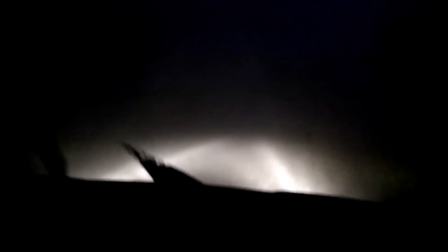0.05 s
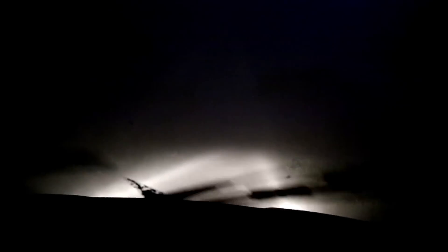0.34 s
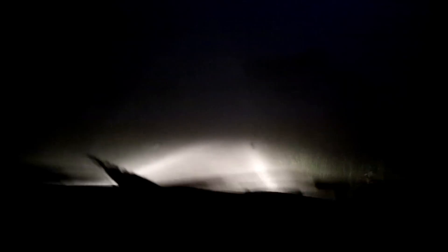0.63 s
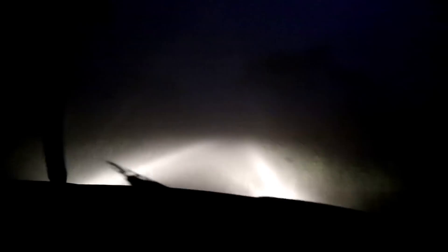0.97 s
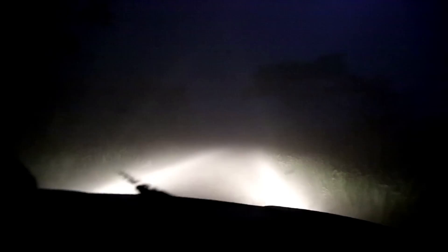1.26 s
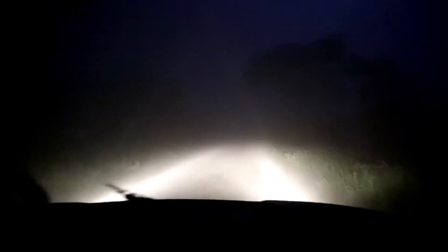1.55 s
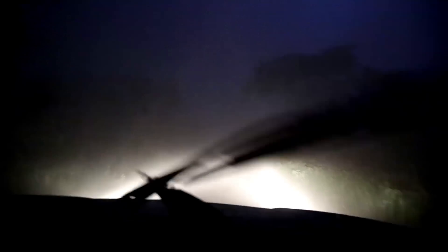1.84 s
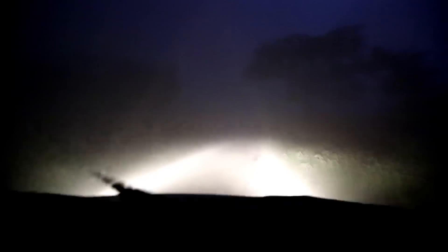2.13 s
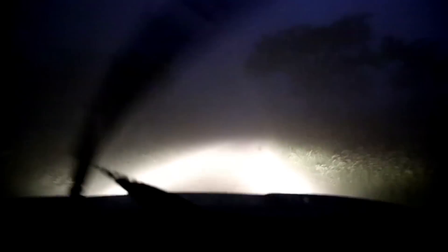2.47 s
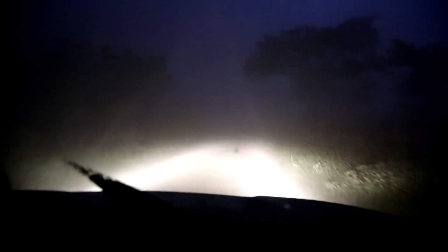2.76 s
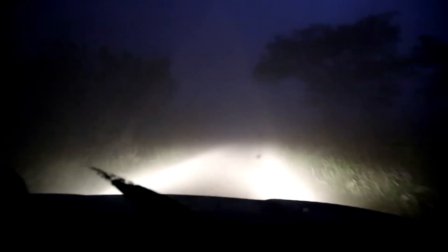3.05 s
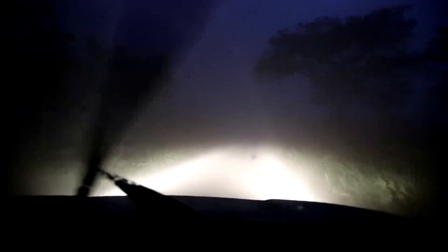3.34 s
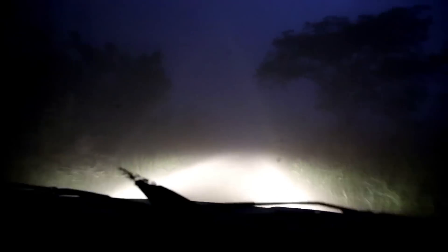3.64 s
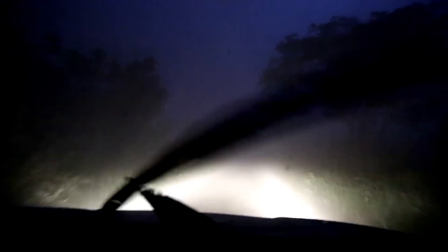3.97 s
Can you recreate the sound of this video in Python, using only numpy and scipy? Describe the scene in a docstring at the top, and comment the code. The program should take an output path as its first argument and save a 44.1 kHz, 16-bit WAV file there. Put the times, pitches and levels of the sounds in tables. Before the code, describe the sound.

A car rumbles over a bumpy wet road, heard from inside, loose trim knocking and ticking.

```python
"""A deep rumble of engine and road fills a car driving along a rough, wet track at night.
Bumps thud through the body, and the tyres throw up water and grit, a wash of noise and tiny impacts.
A loose panel knocks hard three times, smaller trim ticks and scrapes, and a few small metal pieces,
perhaps keys, clink. Each struck part rings in its own damped modes, and the upholstered cabin adds
a short reverberation. A thin electrical whine lies behind it all."""
import sys
import numpy as np
from scipy import signal
from scipy.fft import rfft, irfft
from scipy.io import wavfile

SR = 44100
rng = np.random.default_rng(int(sys.argv[2]) if len(sys.argv) > 2 else 0)


def wav_out(sig):
    """Save sig, one row per channel (or a flat mono array), as 16-bit PCM at SR to the path in sys.argv[1]."""
    wavfile.write(sys.argv[1], SR, np.round(np.clip(np.atleast_2d(sig).T, -1, 1) * 32767).astype(np.int16))


N = 176400
T = np.arange(N) / SR
HIT_T = T[:SR // 4]  # time within one impact


def from_db(db):
    """Amplitude ratio of a level in decibels."""
    return 10 ** (np.asarray(db) / 20)


def unit_rms(x):
    """Normalisation to unit mean power."""
    return x / np.sqrt(np.mean(x ** 2) + 1e-20)


def in_time(rows):
    """Linear interpolation of each column against the first, which is time."""
    times, *columns = np.transpose(rows)
    return [np.interp(T, times, column) for column in columns]


def drift(corner_hz, step=40):
    """Random modulation: low-passed noise of unit rms, drawn once every step samples."""
    pole = np.exp(-2 * np.pi * corner_hz * step / SR)
    white = rng.standard_normal(N // step + 2002)
    slow = signal.lfilter([1], [1, -2 * pole, pole * pole], white)[2000:]  # once the filter has settled
    return np.interp(np.arange(N) / step, np.arange(len(slow)), unit_rms(slow))


def noise(spectrum, size=N):
    """Spectral shaping: coloured noise of unit rms, falling 24 dB per octave beyond the given band."""
    hz, db = np.transpose(spectrum)
    f = np.arange(size // 2 + 1) * SR / size + 1e-3
    colour = from_db(np.interp(np.log(f), np.log(hz), db))
    skirts = np.minimum(1, np.minimum(f / hz[0], hz[-1] / f)) ** 4
    return unit_rms(irfft(rfft(rng.standard_normal(size)) * colour * skirts, size))


def decay(t60, hold_s=0):
    """Exponential damping: after the hold, the level falls 60 dB in t60 seconds."""
    return np.exp(-np.log(1000) * np.maximum(HIT_T - hold_s, 0) / t60)


def rise(seconds):
    """A linear attack."""
    return np.minimum(HIT_T / seconds, 1)


def struck(modes):
    """Free vibration of a struck body: a sum of damped sinusoids."""
    return sum(from_db(db) * decay(t60) * np.sin(2 * np.pi * hz * HIT_T) for hz, db, t60 in modes)


def add(out, start, sound):
    """Superposition: a sound joins the mix at its start in seconds."""
    i = int(start * SR)
    out[i:i + len(sound)] += sound[:max(N - i, 0)]


# The rumble's spectrum. Each row: frequency in Hz, relative spectral density in dB.
RUMBLE_SPECTRUM = [(11, -67), (18, -4.5), (38, 3), (70, -1), (134, 1), (154, -1), (188, -10.5), (225, -10),
                   (255, -12.5), (456, -20.5), (531, -26.5), (700, -29.5), (910, -39.5), (1540, -120)]
# The rumble's contour. Each row: time in seconds, level in dB before its swings are narrowed.
RUMBLE_CONTOUR = [(0.0, -23), (0.7, -13), (0.81, -29.5), (0.83, -20.5), (1.55, -14.5), (1.66, -23.5),
                  (1.8, -21.5), (1.88, -11.5), (1.96, -22), (2.17, -10), (2.26, -14.5), (2.28, -27.5),
                  (2.39, -12.5), (2.76, -25), (2.81, -11), (2.94, -21), (3.12, -6), (3.24, -24),
                  (3.62, -16.5), (3.66, -22.5), (4.0, -9)]

def rumble(swing_share=0.57, gain_db=0.5):
    """Forced vibration: engine and road drive the cabin with low noise that swells and ebbs."""
    contour_db, = in_time(RUMBLE_CONTOUR)
    mean_db = contour_db.mean()
    return noise(RUMBLE_SPECTRUM) * from_db(gain_db + mean_db + swing_share * (contour_db - mean_db))


# Bumps in the track. Each row: start in seconds, peak level in dB, pitch in Hz, length in seconds.
TRACK_BUMPS = [(0.93, -9, 276, 0.02), (1.258, -9.5, 102, 0.017), (1.261, -12.5, 287, 0.013),
               (1.409, -9.5, 149.5, 0.068), (1.498, -13.5, 98.7, 0.061), (2.165, -19, 139, 0.025),
               (2.247, -2.5, 78, 0.013), (2.25, -22, 285, 0.021), (2.44, -12, 116.6, 0.11),
               (2.573, -13, 126, 0.055), (2.779, -25, 408, 0.026), (2.998, -17.5, 218, 0.084),
               (3.107, -20, 129, 0.026), (3.111, -18.5, 464, 0.018), (3.113, -14.5, 282, 0.019),
               (3.117, -27, 610, 0.026), (3.126, -24, 367, 0.022), (3.538, -16.5, 215, 0.048),
               (3.872, -19.5, 219, 0.061), (3.944, -15, 238, 0.026)]

def bumps():
    """Transient response: each bump thuds through the body as a low tone that swells and fades."""
    out = np.zeros(N)
    for start, peak_db, hz, length in TRACK_BUMPS:
        t = T[:int(length * SR)]
        add(out, start, from_db(peak_db) * np.sin(np.pi * t / length) * np.sin(2 * np.pi * hz * t))
    return out


# The loose panel's modes. Each row: frequency in Hz, relative level in dB, T60 in seconds.
PANEL_MODES = [(973, -19, 0.058), (1210, -28, 0.02), (1486, -1, 0.027), (1675, -12.5, .026),
               (1997, -17.5, 0.042), (2670, -22, 0.014), (2860, -14, 0.028), (4290, -11.5, .013),
               (5680, -28, 0.02), (7660, -19, 0.029), (9800, -15, 0.0066)]
# The panel's knocks. Each row: start in seconds, gain in dB, initial boom pitch in Hz,
# relative crack gain in dB, tilt of the modes in dB per octave.
PANEL_KNOCKS = [(1.6180, -2, 571, -5.5, -1), (2.2603, -1.5, 584, -2.5, 0), (2.8690, -8, 546, -5, -1.5)]

def knocks(scatter_db=1.5, boom_db=1, crack_trim_db=-4):
    """Impact excitation: a panel cracks, booms and rings, its modes weighted anew by each blow."""
    out = np.zeros(N)
    lowest_hz = PANEL_MODES[0][0]
    for start, db, boom_hz, crack_db, tilt in PANEL_KNOCKS:
        hollow = from_db(boom_db) * boom(boom_hz)
        modes = [(hz, mode_db + tilt * np.log2(hz / lowest_hz) + scatter_db * rng.standard_normal(), t60)
                 for hz, mode_db, t60 in PANEL_MODES]
        snap = from_db(crack_db + crack_trim_db) * crack()
        add(out, start, from_db(db) * (hollow + struck(modes) + snap))
    return out


def boom(hz, sag_share=0.33, sag_s=0.014, roughness=0.12):
    """Damped oscillation: a knock's hollow tone sags in pitch, roughened by amplitude modulation."""
    pitch = hz * (1 - sag_share * (1 - np.exp(-HIT_T / sag_s)))
    body = decay(0.028, hold_s=0.0067)
    tail = from_db(-24) * decay(0.028, hold_s=0.026)
    flutter = 1 + roughness * drift(160)[:len(HIT_T)]
    return rise(0.003) * np.maximum(body, tail) * flutter * np.sin(2 * np.pi * np.cumsum(pitch) / SR)


# The spectrum of a hard contact. Each row: frequency in Hz, relative spectral density in dB.
CRACK_SPECTRUM = [(400, -12.5), (1200, 7.5), (2800, 1), (3700, -3.5), (4800, -3.5), (6500, -8),
                  (8200, -8.5), (10500, -13), (12500, -19), (16000, -29)]

def crack(tail_db=-6.5):
    """A brief contact has a broad spectrum: a snap of noise with a fainter tail."""
    return noise(CRACK_SPECTRUM, size=len(HIT_T)) * (decay(0.012) + from_db(tail_db) * decay(0.066))


# The wash of the tyres. Each row: time in seconds, base spray level in dB, base hiss level in dB.
TYRE_LEVELS = [(0, -45.5, -53.5), (.15, -42.5, -55), (.4, -40, -52), (.55, -39.5, -48.5), (.78, -39.5, -54),
               (.95, -42, -51.5), (1.06, -35.5, -49.5), (1.17, -39, -46), (1.3, -36.5, -46),
               (1.46, -35.5, -47), (1.6, -40, -46), (1.66, -42.5, -52.5), (1.76, -41.5, -45),
               (1.87, -35.5, -55), (1.96, -44, -50), (2.05, -40.5, -51), (2.22, -37, -45), (2.36, -40, -55),
               (2.5, -43.5, -50), (2.7, -39, -51), (2.95, -41.5, -55.5), (3.1, -39.5, -54.5),
               (3.33, -42.5, -50), (3.62, -48.5, -49), (3.75, -44, -51.5), (4, -39, -52.5)]
# The spectra of spray and hiss. Each row: frequency in Hz, relative spectral density in dB.
SPRAY_SPECTRUM = [(400, 6), (650, -4.5), (950, 4.5), (1400, -0.5), (2000, -4), (3000, -10.5), (4500, -13.5),
                  (8000, -19.5)]
HISS_SPECTRUM = [(1500, -8), (2800, 5), (4200, 0), (6000, -4), (8000, -4), (10500, -6), (13000, -7.5),
                 (16000, -10)]

def tyres(spray_trim_db=-0.5, hiss_trim_db=1, grit_db=-11.5, flutter_db=3.0, flicker_db=2.5):
    """Incoherent addition: spray on the wheel arches merges into noise; the grit follows its level."""
    spray_db, hiss_db = in_time(TYRE_LEVELS)
    spray = noise(SPRAY_SPECTRUM) * from_db(spray_db + spray_trim_db + flutter_db * drift(22.6))
    hiss = noise(HISS_SPECTRUM) * from_db(hiss_db + hiss_trim_db + flicker_db * drift(24.0))
    return spray + hiss + grit() * from_db(spray_db + grit_db)


def grit(grains_per_s=390, spread_db=2.5, ring_cycles=7):
    """Shot noise: grains strike the underbody at random, each ringing for a few cycles."""
    sizes = from_db(spread_db * np.minimum(rng.exponential(1, N), 5))
    signs = rng.choice([-1, 1], N)
    impacts = sizes * signs * (rng.random(N) < grains_per_s / SR)
    pitches = np.geomspace(800, 5000, 16)
    pitch_index = rng.integers(0, len(pitches), N)
    out = np.zeros(N)
    for k, hz in enumerate(pitches):
        ring = struck([(hz, 0, ring_cycles / hz)]) / np.sqrt(hz)
        out += signal.fftconvolve(impacts * (pitch_index == k), ring)[:N]
    return unit_rms(out)


# Puddles and loose gravel. Each row: start in seconds, length before the release in seconds, gain in dB.
PUDDLE_SURGES = [(.52, 0.043, -31.5), (1.006, 0.032, -31), (1.082, 0.032, -32), (1.249, 0.076, -22.5),
                 (1.517, 0.025, -34), (1.83, 0.081, -29), (1.993, 0.062, -31.5), (2.122, 0.11, -36),
                 (2.338, 0.013, -32.5), (2.543, 0.068, -32), (2.756, 0.087, -33.5), (3.11, 0.015, -30),
                 (3.514, 0.37, -38), (3.91, 0.036, -37)]
# The spectrum of a surge. Each row: frequency in Hz, relative spectral density in dB.
SURGE_SPECTRUM = [(450, -5), (700, 5), (950, 9), (1400, -0.5), (2000, -1.5), (2800, -10), (4200, -22.5),
                  (8000, -45)]

def surges(attack_s=0.0035, release_s=0.018, flutter_db=1.5):
    """Dense impacts fuse into noise: gravel and water rush against the underbody in short bursts."""
    envelope = np.zeros(N)
    for start, length, db in PUDDLE_SURGES:
        corners = [start, start + attack_s, start + length, start + length + release_s]
        envelope += from_db(db) * np.interp(T, corners, [0, 0.73, 0.44, 0.0077])
    return envelope * unit_rms(noise(SURGE_SPECTRUM) * from_db(flutter_db * drift(111)))


# The trim's modes. Each row: frequency as a multiple of the pitch, relative level in dB.
TRIM_MODES = [(.7, -9), (1.002, -5), (1.37, -17.5)]
# Taps of the trim. Each row: start in seconds, ring gain in dB, pitch in Hz, hold in seconds,
# crack gain in dB.
TRIM_TICKS = [(0.4233, -13, 1694, 0.0054, -27), (0.425, -19.5, 1110, 0.0038, -33),
              (0.627, -29.5, 1600, 0.0068, -33), (0.663, -33, 1180, 0.002, -53),
              (0.748, -23, 1760, 0.0017, -33), (1.0614, -5.5, 1900, 0.0014, -25.5),
              (1.063, -12.5, 2450, 0.0019, -44), (1.256, -14.5, 1650, 0.0031, -33),
              (1.278, -23.5, 2460, 0.0078, -24), (1.344, -49, 1600, .003, -27.5),
              (1.382, -45, 1980, .003, -27), (1.562, -28, 1180, 0.0036, -36),
              (1.781, -26.5, 1790, 0.0025, -26), (1.7874, -32, 1700, 0.0052, -25),
              (1.856, -30, 1560, 0.0022, -25), (1.914, -47, 1590, .003, -25), (2.168, -30, 2360, .003, -27),
              (2.183, -30, 1850, 0.0046, -21), (2.306, -25, 1510, 0.0042, -28.5),
              (2.34, -27, 2650, .003, -29), (2.426, -11.5, 1810, 0.0023, -15.5),
              (2.465, -13, 1600, 0.0023, -22), (2.477, -19.5, 2840, 0.0045, -23),
              (2.494, -35, 1660, .003, -26), (2.649, -27.5, 2780, 0.0037, -43),
              (2.7213, -22.5, 3220, 0.0013, -30.5), (2.794, -28, 1900, 0.0028, -42),
              (3.076, -11, 1570, 0.0031, -18.5), (3.124, -36, 1680, 0.0026, -21),
              (3.201, -62, 1800, .003, -37.5), (3.2427, -29, 3030, 0.0032, -24.5),
              (3.349, -27, 2860, 0.0016, -49), (3.817, -21, 1650, 0.00085, -28),
              (3.924, -21, 1033, 0.0058, -43)]

def ticks(t60=0.003):
    """Heavy damping: small plastic parts tap and ring for only a few milliseconds."""
    out = np.zeros(N)
    for start, ring_db, hz, hold_s, crack_db in TRIM_TICKS:
        tone = sum(from_db(mode_db) * np.sin(2 * np.pi * (hz * ratio * HIT_T + rng.random()))
                   for ratio, mode_db in TRIM_MODES)
        ring = from_db(ring_db) * tone * rise(0.00014) * decay(t60, hold_s)
        snap = from_db(crack_db) * rise(0.0017) * crack()
        add(out, start, ring + snap)
    return out


# The modes of five metal pieces, "a" the largest. Each row: frequency in Hz, relative level in dB,
# T60 in seconds.
METAL_MODES = {"a": [(3774, 0, .24), (12120, -8.5, .14)], "b": [(6470, 0, .33)], "c": [(9934, 0, .28)],
               "d": [(8803, -4, .14), (12750, 0, .19)], "e": [(13980, 0, .09)]}
# Touches of the metal. Each row: start in seconds, piece touched, gain in dB.
METAL_TOUCHES = [(.628, "a", -60), (.748, "a", -48), (1.192, "e", -40), (1.345, "a", -36),
                 (1.618, "e", -37), (1.916, "b", -51), (2.138, "e", -49), (2.183, "a", -33),
                 (2.241, "a", -43), (2.279, "b", -44), (2.279, "c", -42), (2.279, "d", -38),
                 (2.279, "e", -35), (2.297, "d", -42), (2.426, "a", -42), (2.426, "b", -43.5),
                 (2.441, "b", -46), (2.466, "b", -59), (2.478, "c", -55), (2.478, "e", -48),
                 (2.545, "e", -57), (2.869, "e", -59), (3.077, "a", -43), (3.077, "b", -46),
                 (3.077, "e", -49), (3.123, "a", -41), (3.125, "e", -40), (3.246, "a", -34),
                 (3.244, "b", -56), (3.843, "d", -49), (3.843, "e", -38)]

def clinks(shiver_db=-64):
    """Light damping: metal rings on after each touch; road vibration keeps the largest piece shivering."""
    shiver = signal.fftconvolve(rng.standard_normal(N), struck(METAL_MODES["a"]))[:N]
    out = from_db(shiver_db) * unit_rms(shiver)
    for piece, modes in METAL_MODES.items():
        for hz, mode_db, t60 in modes:
            swing = np.zeros(N)
            for start, touched, db in METAL_TOUCHES:
                if touched == piece:
                    add(swing, start, from_db(db + mode_db) * rise(0.0012) * decay(t60))
            out += swing * np.sin(2 * np.pi * hz * T)
    return out


# Rubbing trim. Each row: start in seconds, length in seconds, centre frequency in Hz, level in dB.
TRIM_SCRAPES = [(1.27, 0.046, 3970, -35.5), (1.274, 0.025, 9350, -41.5), (2.969, 0.036, 8560, -44)]

def scrapes(half_width=0.075):
    """Frictional excitation: rubbing trim drives a narrow resonance for a moment."""
    out = np.zeros(N)
    for start, length, hz, db in TRIM_SCRAPES:
        edges_hz = [hz * (1 - half_width), hz * (1 + half_width)]
        band = signal.butter(2, edges_hz, "band", fs=SR, output="sos")
        rub = unit_rms(signal.sosfilt(band, rng.standard_normal(len(HIT_T))))
        add(out, start, from_db(db) * rub * np.sin(np.pi * np.minimum(HIT_T / length, 1)))
    return out


def cabin(x, t60=0.042, cutoff_hz=7700, gain_db=-20):
    """Absorption: upholstery leaves the cabin's reverberation short and dull."""
    lowpass = signal.butter(2, cutoff_hz, fs=SR, output="sos")
    tail = signal.sosfilt(lowpass, rng.standard_normal(len(HIT_T))) * rise(0.0031) * decay(t60)
    return from_db(gain_db) * signal.fftconvolve(x, tail / np.sqrt(np.sum(tail ** 2)))[:N]


def whine(hz=15657, rms_db=-62):
    """A pure tone: the thin, steady electrical whine."""
    return from_db(rms_db) * np.sqrt(2) * np.sin(2 * np.pi * hz * T)


# A brief dip in everything but the whine. Each row: time in seconds, gain in dB.
LEVEL_DIP = [(.771, 0), (.777, -12), (.801, -12), (.812, -3), (.84, 0)]

def scene():
    """Superposition: driving noise, rattles with their reverberation, and the whine add in mono."""
    rattles = knocks() + ticks() + clinks() + scrapes()
    driving = rumble() + bumps() + tyres() + surges()
    dip_db, = in_time(LEVEL_DIP)
    return ((driving + rattles + cabin(rattles)) * from_db(dip_db) + whine())[None]


def record(dry, threshold_db=-1.5, range_db=4, attack_s=0.0019, release_db_per_s=94, cutoff_hz=16750):
    """Peak limiting: the gain ducks after the hardest knocks, whose first peaks clip; the top is cut."""
    over_db = np.clip(20 * np.log10(np.abs(dry[0]) + 1e-9) - threshold_db, 0, range_db)
    held_db = np.maximum.accumulate(over_db + release_db_per_s * T) - release_db_per_s * T
    pole = np.exp(-1 / (attack_s * SR))
    reduction_db = signal.lfilter([1 - pole], [1, -pole], held_db)
    limited = np.clip(dry * from_db(-reduction_db), -1, 1)
    return signal.sosfiltfilt(signal.cheby2(16, 50, cutoff_hz, fs=SR, output="sos"), limited)


dry = scene()
out = record(dry)
wav_out(out)
```